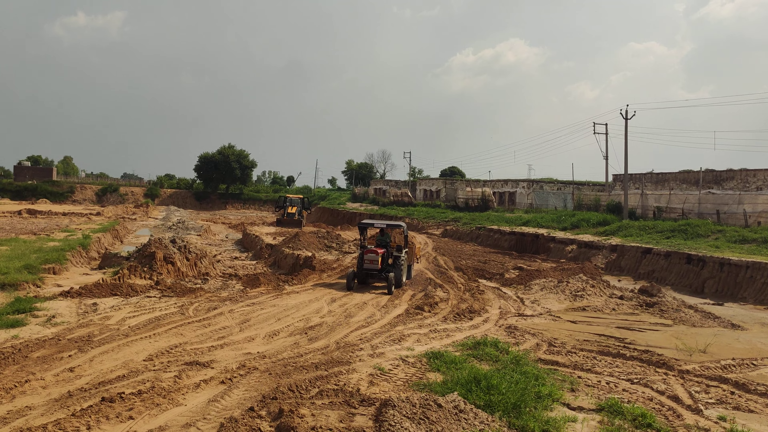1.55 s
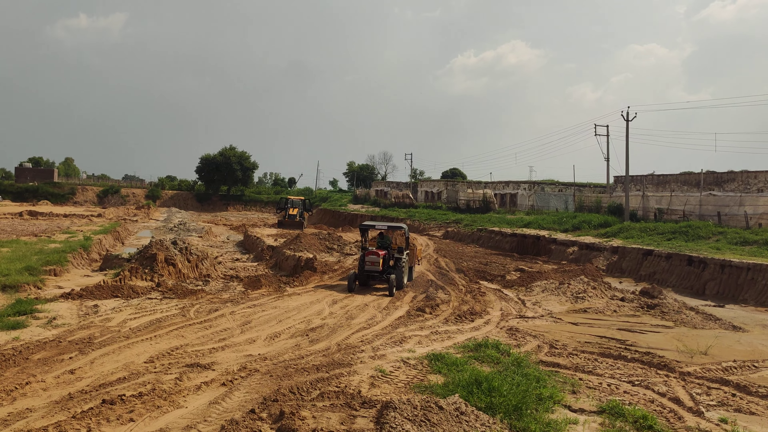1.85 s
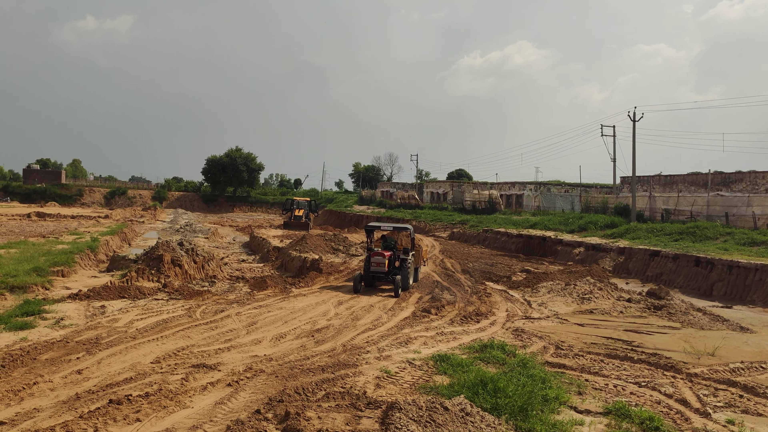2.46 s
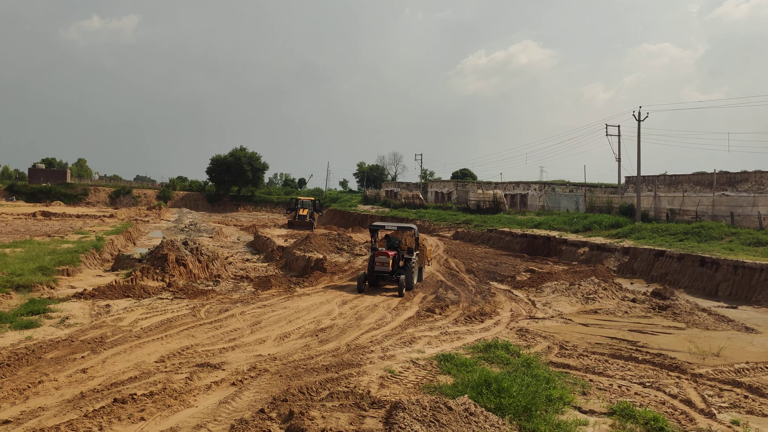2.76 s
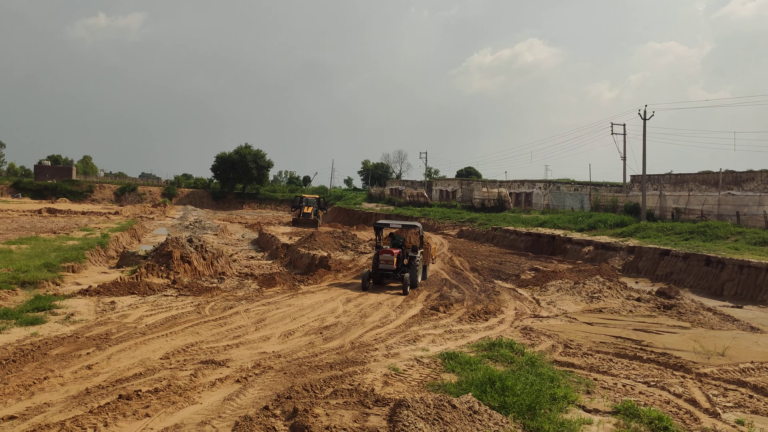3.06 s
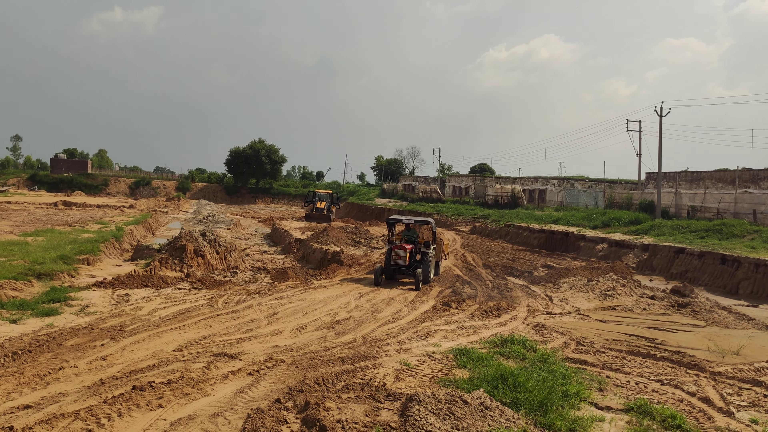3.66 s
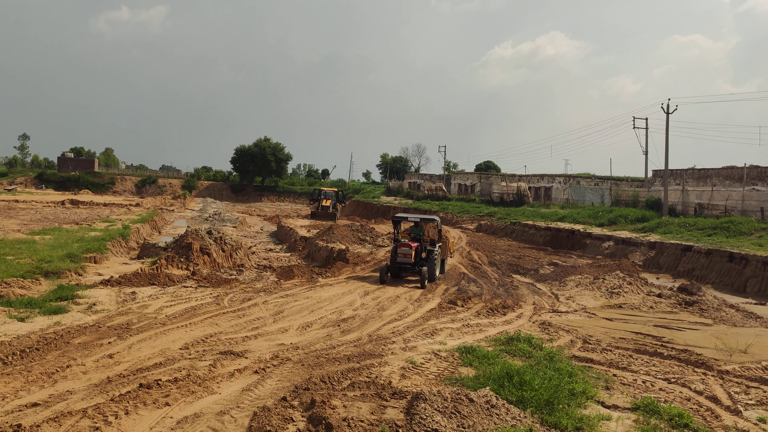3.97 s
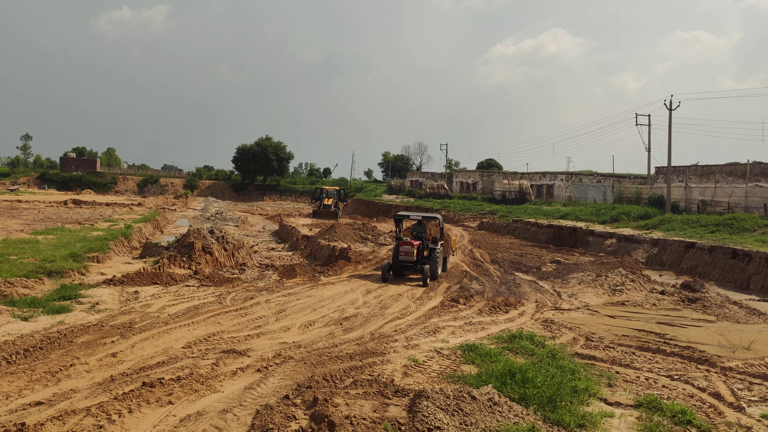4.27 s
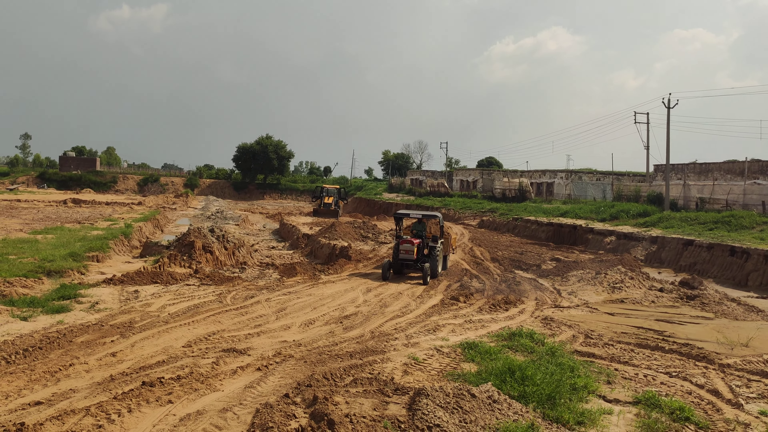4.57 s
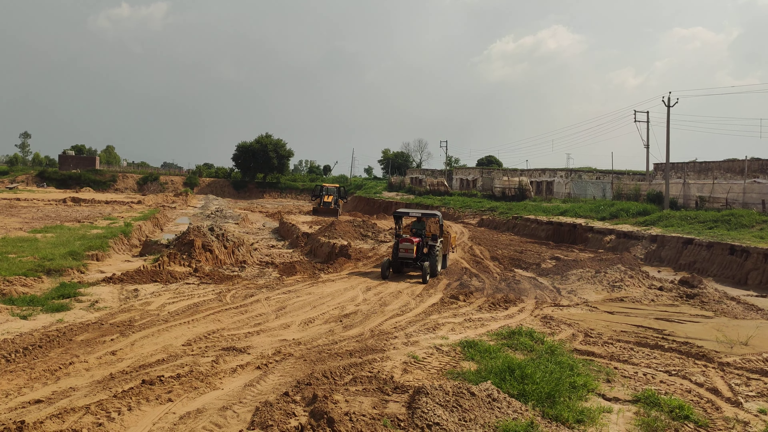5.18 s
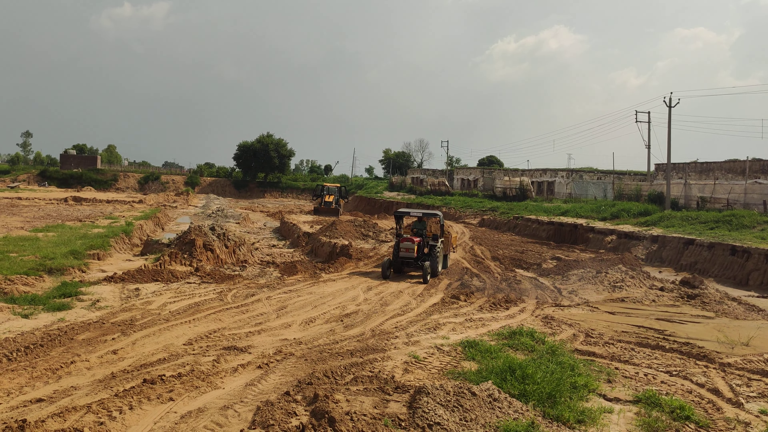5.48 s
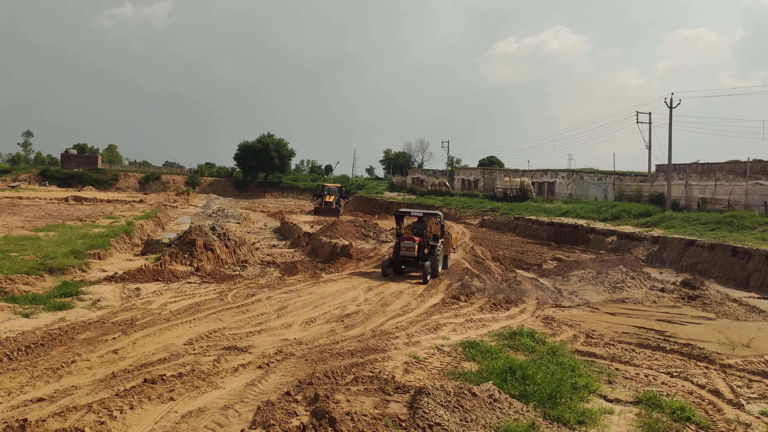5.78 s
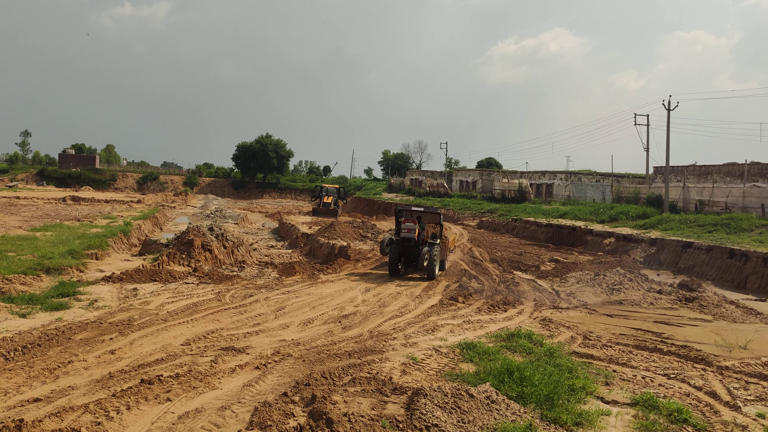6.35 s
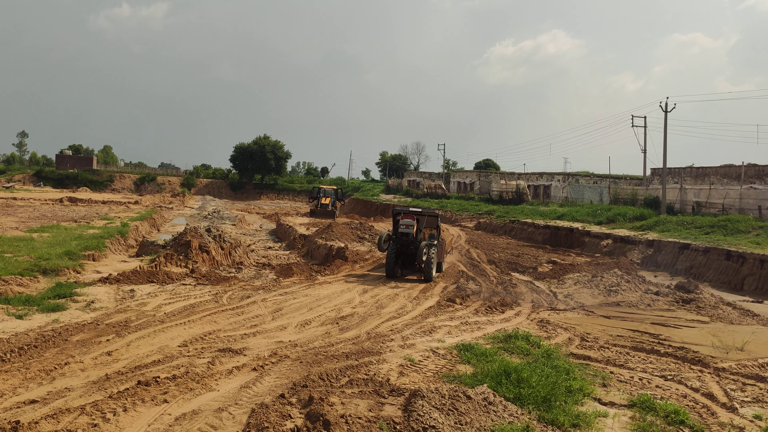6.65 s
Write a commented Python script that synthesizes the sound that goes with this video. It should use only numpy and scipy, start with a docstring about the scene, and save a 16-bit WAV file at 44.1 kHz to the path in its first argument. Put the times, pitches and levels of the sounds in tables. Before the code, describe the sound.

A single-cylinder diesel tractor labours up a sandy slope, its sharp exhaust beats quickening and growing louder over rumble and gear clatter.

```python
"""A single-cylinder diesel tractor labours up a sandy slope in an open pit.
Chassis and gears churn over steady air. The engine fires with one hard first knock; each cycle brings a
combustion knock, then a thump and a turbulent blast from the open exhaust pipe, which the pit reflects.
Metal clanks at 1.2-1.5 s. The firings quicken from about 4 to 14 a second, and near top speed
the blasts turn raspy and the body drones. Two small microphone ports colour it all."""
import sys
import numpy as np
from scipy import signal
from scipy.fft import rfft, irfft
from scipy.io import wavfile
from scipy.ndimage import uniform_filter1d, map_coordinates

SR = 44100
rng = np.random.default_rng(int(sys.argv[2]) if len(sys.argv) > 2 else 0)


def store_pcm(level_fs):
    """Save levels as 16-bit WAV."""
    pcm = np.round(np.clip(level_fs, -1, 1) * 32767).astype(np.int16)
    wavfile.write(sys.argv[1], SR, np.atleast_2d(pcm).T)


N = 305127
TIME = np.arange(N) / SR


def from_db(db):
    """Amplitude ratio of a level in decibels."""
    return 10 ** (np.asarray(db) / 20)


def unit_rms(x):
    """Normalisation of each row to unit power."""
    return x / np.sqrt(np.mean(x ** 2, axis=-1, keepdims=True) + 1e-20)


def curves(rows, at=TIME):
    """Linear interpolation of each column of a table in time."""
    t, *columns = np.transpose(rows)
    return [np.interp(at, t, column) for column in columns]


def drift(rate):
    """Random modulation: a line through rate Gaussian values a second."""
    return np.interp(TIME * rate, np.arange(N), rng.standard_normal(N))


def stereo_noise(side_db, size=N):
    """Partially coherent white noise: a common signal plus and minus a weaker side signal."""
    mid, side = rng.standard_normal((2, size))
    return unit_rms(mid + from_db(side_db) * side * np.array([[1], [-1]]))


def convolve(x, response):
    """Convolution of a sound with an impulse response."""
    return signal.fftconvolve(np.atleast_2d(x), np.atleast_2d(response), axes=-1)[:, :N]


def filtered(x, order, hz, kind):
    """Maximally flat low-, high- or band-pass filtering."""
    return signal.sosfilt(signal.butter(order, hz, kind, fs=SR, output="sos"), x)


def colour(x, spectrum, peaks=(), size=8192):
    """Minimum-phase filtering, at unit power gain, by a spectrum with resonance peaks on top."""
    hz, points = np.arange(size // 2 + 1) * SR / size, np.array(spectrum)
    db = np.interp(np.log(hz + 1), np.log(points[:, 0]), points[:, 1])
    for centre, width, lift in peaks:
        db = db + lift / (1 + (2 * (hz - centre) / width) ** 2)
    cepstrum = irfft(np.log(from_db(db)))[:size // 2]
    cepstrum[0] = 0
    response = irfft(np.exp(rfft(2 * cepstrum, size)))[:size // 2]
    return convolve(x, response / np.linalg.norm(response))


def ring(x, hz, t60):
    """Damped oscillator: a unit impulse excites a decaying sine of height 1."""
    r, w = from_db(-60 / (t60 * SR)), 2 * np.pi * hz / SR
    return signal.lfilter([0, np.sin(w)], [1, -2 * r * np.cos(w), r * r], x + 1e-18)


def lay_out(times, shapes):
    """Superposition of short sounds, one a row, each centred on its time."""
    size = shapes.shape[1]
    at = np.round(times * SR).astype(int)[:, None] + np.arange(size) - size // 2
    return np.bincount(np.maximum(at, 0).ravel(), shapes.ravel(), N)[:N]


def cycle_phase(times):
    """Engine phase in cycles, a whole number at each firing."""
    return np.interp(TIME, times, np.arange(len(times)))


# Firing rate of the engine: t/s, f/Hz
FIRING_RATE = [(0.29, 4.252), (1.0, 5.448), (2.09, 7.495), (2.98, 9.257), (3.84, 10.973), (4.88, 12.899),
               (5.58, 13.696), (6.92, 14.102)]
def firing_times(first_s=0.288):
    """Phase is the integral of frequency: the engine fires once per completed cycle."""
    t = np.arange(first_s, N / SR + .02, 1 / SR)
    cycles = np.cumsum(np.interp(t, *np.transpose(FIRING_RATE))) / SR
    return np.interp(np.arange(int(cycles[-1]) + 1), cycles, t)


# Spectral density of the air in the pit: f/Hz, relative level/dB
AIR_SPECTRUM = [(30, -4), (120, -4.5), (260, 1.5), (430, -3), (750, 2), (1300, -6), (2500, -23),
                (4500, -29), (7000, -48), (14000, -35)]
def air():
    """Stationary noise: the steady air of the open pit."""
    return colour(stereo_noise(side_db=-13), AIR_SPECTRUM)


# Running gear under load: t/s, chassis level/dB, relative gear level/dB
LOAD_LEVELS = [(0, -54, -47), (.37, -56.5, -55.5), (1.0, -51.5, -45.5), (2.25, -52, -42), (3.25, -48, -41),
               (4.0, -52, -44.5), (4.45, -47, -40), (4.75, -54.5, -44), (5.7, -45.5, -35),
               (6.4, -45, -34.5), (6.92, -40.5, -32)]
# Spectral density of the chassis rumble: f/Hz, relative level/dB
RUMBLE_SPECTRUM = [(20, -37), (45, -35), (100, -4), (160, 0.5), (245, 4), (315, -10.5), (450, -22.5),
                   (900, -38)]
def chassis(times, firing_hz, rumble_db, shake_s=0.026, harmonic=17, fade_db_per_hz=17, size=8192):
    """Forced vibration: strokes shake the frame alike, wheels rumble, one harmonic drones at speed."""
    shake = rng.standard_normal(size) * np.exp(-np.arange(size) / SR / shake_s)
    strokes = lay_out(times, np.ones((len(times), 1)))
    frame = from_db(-2) * unit_rms(convolve(strokes, shake))
    wheels = from_db(-4) * stereo_noise(side_db=-33)
    rumble = colour(frame + wheels, RUMBLE_SPECTRUM)
    drone_db = -43.5 - fade_db_per_hz * (firing_hz.max() - firing_hz)
    drone = -np.sin(2 * np.pi * harmonic * (cycle_phase(times) + 0.04))
    return from_db(rumble_db) * rumble + from_db(drone_db) * drone


# Spectral density of the gear clatter: f/Hz, relative level/dB
CLATTER_SPECTRUM = [(200, -5), (450, -13.5), (780, 0), (1100, -3.5), (2000, -2), (3300, -5), (4500, -11),
                    (6300, -21), (7500, -26), (10000, -17.5), (14000, -31)]
def gears(times, firing_hz, level_db, teeth=96, surge_db=3, surge_lag_cycles=0.29):
    """Amplitude modulation: clatter surges after each stroke, over a whine at the tooth-mesh rate."""
    surge = np.cos(2 * np.pi * (cycle_phase(times) - surge_lag_cycles))
    rattling = from_db(2.1 * drift(60) + 2.6 * drift(500) + surge_db * surge)
    clatter = from_db(level_db - 6) * colour(stereo_noise(side_db=-3) * rattling, CLATTER_SPECTRUM)
    whine = np.sin(2 * np.pi * np.cumsum(teeth * firing_hz) / SR + 1.7 * drift(60))
    return clatter + from_db(level_db - 15.5 + 4 * drift(11)) * whine


# Response of the engine block: f/Hz, relative level/dB
BLOCK_SPECTRUM = [(200, -20), (450, 1), (800, 8.5), (1500, 8), (2500, 1), (4000, -7.5), (6300, -21),
                  (10000, -23), (14000, -16)]
def knocks(times, period, lead_cycles=0.3, swell_s=0.0053, decay_s=0.031, size=8192):
    """Impulsive excitation: fuel ignites before the exhaust opens and rattles the block."""
    t = np.maximum(np.arange(size) - size // 2, 0) / SR
    envelope = (1 - np.exp(-t / swell_s)) * np.exp(-t / decay_s)
    heavy_db = np.log2(period / np.median(period))   # 1 dB harder at half the speed
    strength = from_db(0.5 * rng.standard_normal(len(times)) + heavy_db)
    rattle = stereo_noise(side_db=-6) * from_db(3 * drift(700))
    bursts = lay_out(times - lead_cycles * period, envelope * strength[:, None])
    return colour(rattle * bursts, BLOCK_SPECTRUM)


# One hard first engine knock, then metal clanks at 1.2-1.5 s: t/s, f/Hz, relative level/dB
FIRST_KNOCK_AND_CLANKS = [(0.229, 1560, -50), (1.218, 2250, -43), (1.311, 1290, -46), (1.393, 1380, -43),
                          (1.47, 1360, -46)]
def first_knock_and_clanks(width_hz=230, swell_s=0.0021, decay_s=0.019):
    """Narrow-band resonance: the first knock and each later clank chatter briefly around one pitch."""
    t60, out = np.log(1000) / np.pi / width_hz, 0
    for start, hz, db in FIRST_KNOCK_AND_CLANKS:
        t = np.maximum(TIME - start, 0)
        envelope = (1 - np.exp(-t / swell_s)) * np.exp(-np.minimum(t / decay_s, 20))
        chatter = unit_rms(ring(rng.standard_normal(N), hz, t60))
        out = out + 2 * from_db(db) * chatter * envelope
    return out


# Modes of the pipe and body panels: f/Hz, gain/dB, T60/s
BOOM_MODES = [(118, -52, .1), (165, -43.5, .07), (238, -49.5, .2), (268, -56, .12), (346, -50, .2)]
def thumps(times, period, level_db, lead_s=0.0037, width_s=0.0011, size=1536):
    """Modal ringing: the gas slug ahead of the jet pushes, then sucks, and pipe and panels boom."""
    slowness = period[:, None] / np.median(period)
    t = (np.arange(size) - size // 2) / SR / slowness ** 0.13
    u = (t + lead_s) / width_s
    push = unit_rms(-u * np.exp(-u ** 2 / 2)) * from_db(level_db)[:, None]
    pulses = filtered(lay_out(times, push), 1, 70, "high")
    # slow strokes move more gas and drive the pipe's lowest mode harder
    heave = from_db(-43) * ring(lay_out(times, push * slowness), hz=68, t60=0.078)
    boom = sum(ring(pulses, hz, t60) * from_db(db) for hz, db, t60 in BOOM_MODES)
    return pulses + heave + boom


# Spectral density of the jet at the pipe mouth: f/Hz, relative level/dB
JET_SPECTRUM = [(300, -14), (450, -19), (700, -1), (1000, -6), (1500, 0.5), (2200, -2), (2500, -6.5),
                (3700, -5.5), (4700, -9), (6300, -19.5), (7300, -29), (10000, -20), (14000, -21.5)]
# Exhaust pipe resonances: f/Hz, bandwidth/Hz, lift/dB
PIPE_RESONANCES = [(740, 300, 1), (1560, 410, 6.5), (2152, 250, 5.5), (3860, 1000, 3)]
def blasts(times, period, level_db, bark_db, rasp_db, eddy_hz,
           rise_s=0.0019, fall_s=0.0021, trail_s=0.012, focus_db=2.5, focus_hz=300, size=1536):
    """Turbulent jet noise: the valve opens and gas tears out for a few ms, more briefly at speed."""
    slowness = period / np.median(period)
    t = (np.arange(size) - size // 2) / SR / slowness[:, None] ** 0.56   # slow strokes stretch time
    burst = np.exp(-(t / np.where(t < 0, rise_s, fall_s)) ** 2 / 2)
    trail = from_db(-22) * (t > 0) * np.exp(-abs(t) / trail_s)
    crackle_db = unit_rms(uniform_filter1d(rng.standard_normal(t.shape), size=30))
    envelope = (burst + trail) * from_db(crackle_db)
    # the eddies of each blast favour two pitches of their own
    hz = np.arange(size // 2 + 1) * SR / size
    favoured = sum(np.exp(-((hz - pitch[:, None]) / focus_hz) ** 2 / 2) for pitch in eddy_hz)
    eddies = irfft(rfft(rng.standard_normal(t.shape)) * from_db(focus_db * favoured))
    # the hiss above 7 kHz is heard duller as the firings quicken
    top_hiss_db = 0.23 * rasp_db + 6.5 * np.log2(slowness) + 1.5 * rng.standard_normal(len(times))
    bands_db = bark_db, -rasp_db / 2, rasp_db / 2, top_hiss_db
    edges_hz, jet = [250, 1150, 2600, 7200, 15000], 0
    for low, high, band_db in zip(edges_hz, edges_hz[1:], bands_db):
        band = unit_rms(filtered(eddies, 4, [low, high], "band") * envelope)
        jet = jet + band * np.sqrt(2 * (high - low) / SR) * from_db(level_db + band_db)[:, None]
    return colour(lay_out(times - .0004, jet), JET_SPECTRUM, PIPE_RESONANCES)


# Engine effort, as blast strength: t/s, relative level/dB
BLAST_LEVELS = [(.29, -45), (.5, -23), (1.1, -19), (1.43, -20), (1.9, -15.5), (2.65, -13.5), (3.3, -14),
                (4.3, -14), (4.75, -15.5), (5.4, -14.5), (6.2, -14.5), (6.4, -16.5), (6.68, -15),
                (6.82, -14)]
# Hollow bark near 800 Hz within the blast: t/s, relative level/dB
BARK_LEVELS = [(.5, 2.5), (2.7, -1), (3.2, -2.5), (3.9, -1), (4.8, -8), (5.75, 2.5), (6.9, -1)]
# Strokes that stand out, hard or weak: t/s, added level/dB, added bark/dB
STROKE_ACCENTS = [(1.88, 0.5, -3), (2.02, -1, 6), (2.65, 2.5, 4), (2.76, .5, 4.5), (2.87, -3.5, -0.5),
                  (3.59, 2.5, -3), (3.78, 1, 1.5), (3.96, 1.5, 1.5), (4.56, 2.5, 5), (4.8, 0.5, 4),
                  (5.03, 3, 2.5), (5.18, -3.5, 3.5), (6.42, 0.5, 2.5), (6.71, -3.5, 12)]
def exhaust(times, period, cruise_hz=11, strain_range_hz=0.39):
    """Pulsating flow: effort sets the strength of jet and thump, speed the eddy pitch, strain the rasp."""
    chance = rng.standard_normal((len(times), 5)).T
    speed, = curves(FIRING_RATE, times)
    strain = np.exp((speed - speed.max()) / strain_range_hz)   # 1 at top speed
    level_db = curves(BLAST_LEVELS, times)[0] + 1.5 * chance[0]
    bark_db = curves(BARK_LEVELS, times)[0] + 1.5 * chance[1]
    for t, added_db, added_bark_db in STROKE_ACCENTS:
        stroke = np.argmin(abs(times - t))
        level_db[stroke] += added_db
        bark_db[stroke] += added_bark_db
    rasp_db = 2.2 + 7 * strain + 3 * chance[2]   # tilt towards the treble
    honk_hz = 1770 * (speed / cruise_hz) ** 0.42 * np.exp(0.11 * chance[3])
    crack_hz = 3690 * (speed / cruise_hz) ** 0.15 * np.exp(0.14 * chance[4])
    thump_db = -20 + 0.63 * level_db + 2 * strain
    jet = from_db(-10.5) * blasts(times, period, level_db, bark_db, rasp_db, (honk_hz, crack_hz))
    return jet, from_db(-12) * thumps(times, period, thump_db)


def pit_echoes(x, times, near_s=0.0098, far_s=0.13, bank_s=0.0474, bank_width_s=0.0047,
               paths=9, size=12288):
    """Reflection: bright scatter off bonnet and leaves, an echo from the sand bank, a faint dull tail."""
    def scatter(envelope, db):
        """Diffuse reflection: shaped noise with an energy of db."""
        return from_db(db) * unit_rms(envelope * stereo_noise(side_db=-2.5, size=size)) / np.sqrt(size)

    t, out = np.arange(size) / SR, 0
    arrived = np.clip((t - .003) / .003, 0, 1)
    near_decay = arrived * np.exp(-t / near_s)
    beat = np.round(cycle_phase(times))
    for path in range(paths):   # the tractor moves, so the paths change from beat to beat
        bonnet = scatter(near_decay, db=-13)
        leaves = filtered(scatter(near_decay, db=-9), 2, 6000, "high")
        tail = scatter(arrived * np.exp(-t / far_s), db=-24)
        bank = scatter(np.exp(-((t - bank_s) / bank_width_s) ** 2 / 2), db=-29)
        response = bonnet + leaves + filtered(tail + bank, 1, 6000, "low")
        out = out + convolve(x * (beat % paths == path), response)
    return out


# Stereo position of the tractor: t/s, left minus right level/dB, left lag/samples
BEARING = [(0, -3, 0.75), (1.5, -2.5, -0.98), (2.4, -1.5, 0.039), (3.2, 1.5, -0.61), (4.0, 3, -0.85),
           (4.7, 1.5, -0.73), (5.2, 4.5, -0.49), (5.7, 2.5, -0.79), (6.9, 3, -1.7)]
def placed(x):
    """Level and time cues: as the tractor swings across, it reaches one port louder or sooner."""
    balance_db, lag = curves(BEARING)
    left = map_coordinates(x[0], [np.arange(N) - lag], order=3, mode="nearest")
    return np.array([left, x[1]]) * from_db(balance_db * np.array([[1], [-1]]) / 2)


def scene():
    """Superposition of the tractor, the echoes of its blasts and the air of the pit."""
    times = firing_times()
    period = np.gradient(times)
    firing_hz, = curves(FIRING_RATE)
    rumble_db, gear_db = curves(LOAD_LEVELS)
    jet, thump = exhaust(times, period)
    knock = from_db(-40.5) * knocks(times, period)
    tractor = knock + thump + jet + pit_echoes(jet, times) + first_knock_and_clanks()
    tractor += chassis(times, firing_hz, rumble_db) + gears(times, firing_hz, gear_db)
    return placed(tractor) + from_db(-49.5) * air()


# Microphone ports, left and right: f/Hz, bandwidth/Hz, gain/dB, treble leak/dB
PORT_CAVITIES = [(6370, 890, 1.9, -54), (4350, 1216, -0.21, -12.5)]
def port(x, hz, width, db, leak_db):
    """Cavity resonance: a microphone's sound hole is flat below its pitch and only leaks above."""
    r, w = np.exp(-np.pi * width / SR), 2 * np.pi * hz / SR
    poles = [1, -2 * r * np.cos(w), r * r]
    zeros = sum(poles) * np.array([0, 1, 0]) - from_db(leak_db) * np.array([1, -2, 1])
    return from_db(db) * signal.lfilter(zeros, poles, x)


def record(dry, ceiling=1.13, cutoff_hz=14000):
    """Each port resonates, soft saturation rounds the peaks and a low-pass filter cuts the top."""
    heard = np.array([port(x, *cavity) for x, cavity in zip(dry, PORT_CAVITIES)])
    rounded = ceiling * np.tanh(heard / ceiling)
    return signal.sosfilt(signal.ellip(8, .3, 80, cutoff_hz, fs=SR, output="sos"), rounded)


dry = scene()
out = record(dry)
store_pcm(out)
```